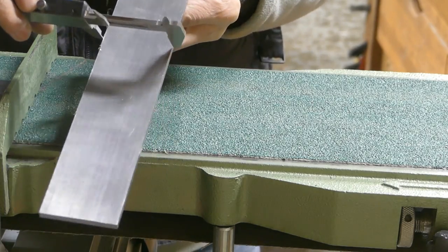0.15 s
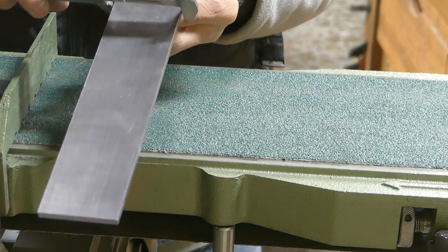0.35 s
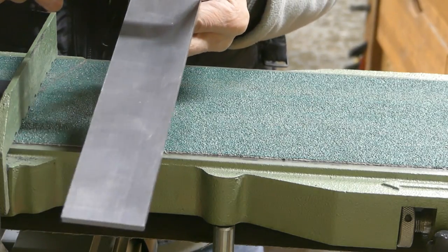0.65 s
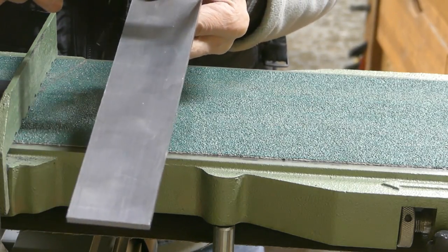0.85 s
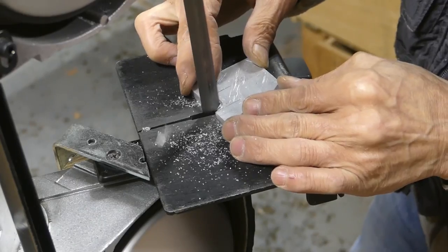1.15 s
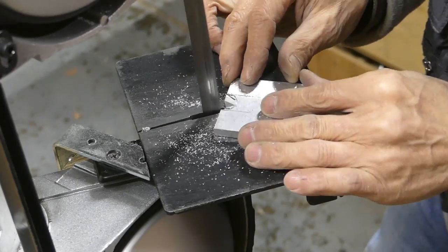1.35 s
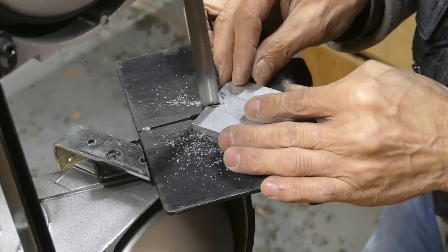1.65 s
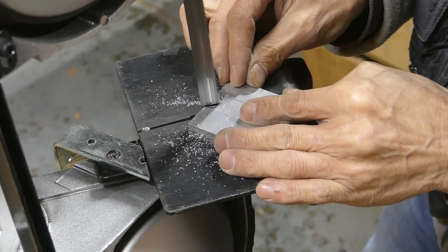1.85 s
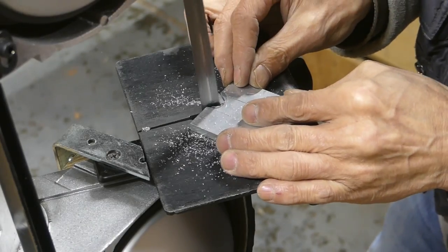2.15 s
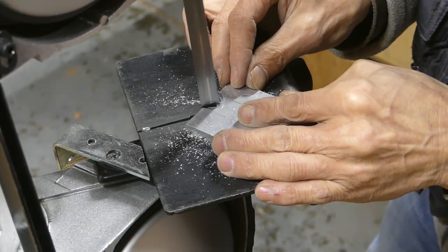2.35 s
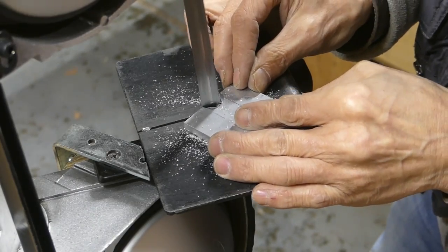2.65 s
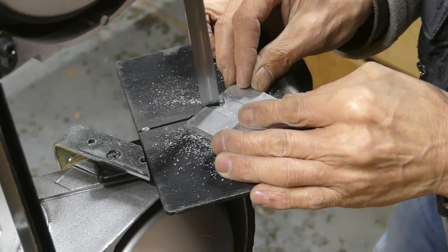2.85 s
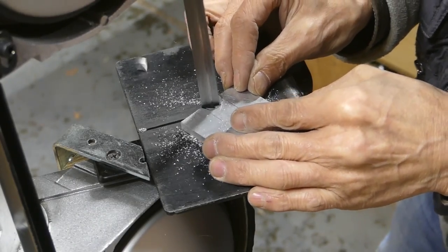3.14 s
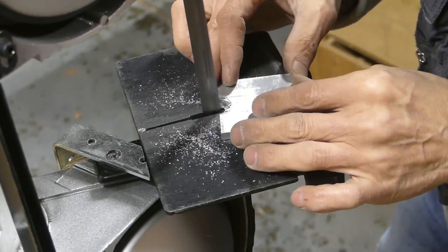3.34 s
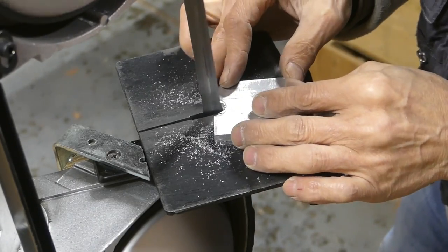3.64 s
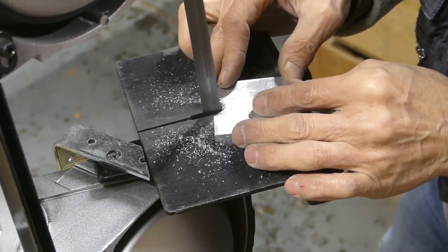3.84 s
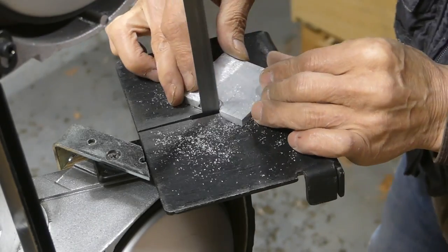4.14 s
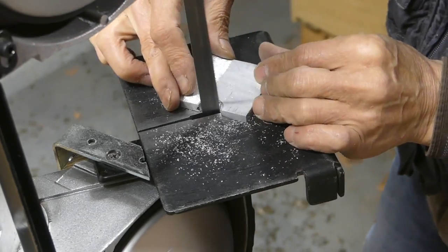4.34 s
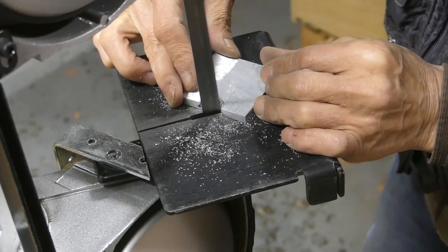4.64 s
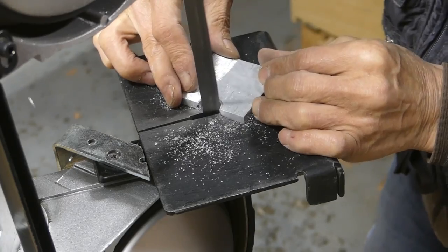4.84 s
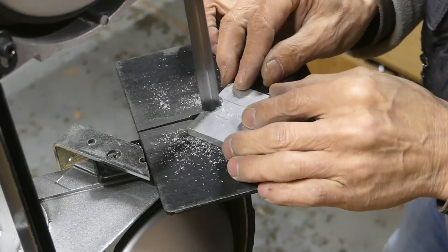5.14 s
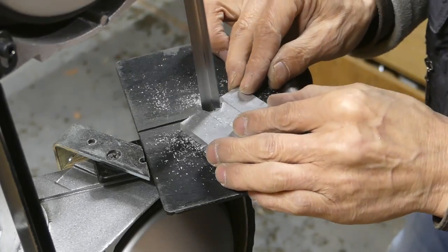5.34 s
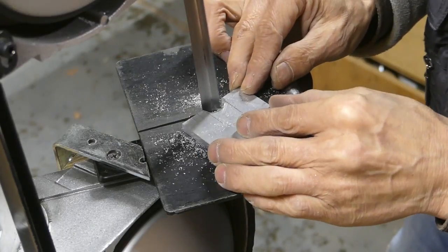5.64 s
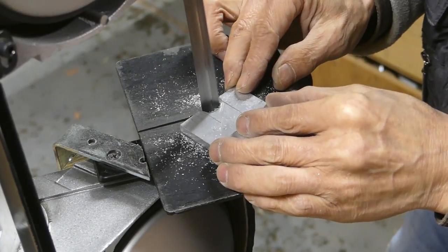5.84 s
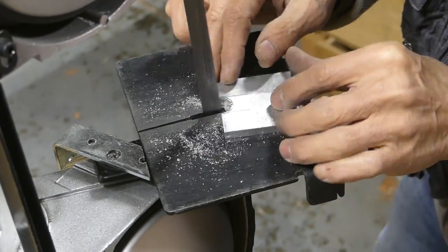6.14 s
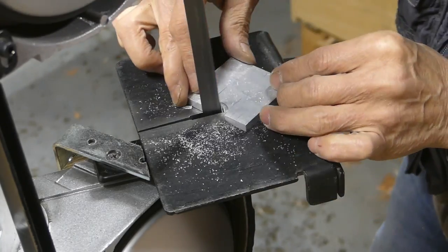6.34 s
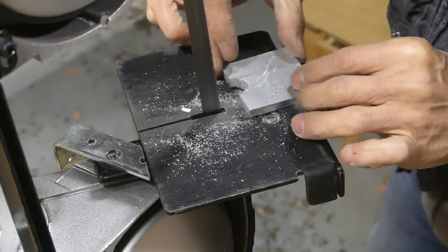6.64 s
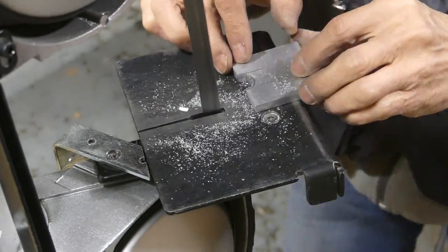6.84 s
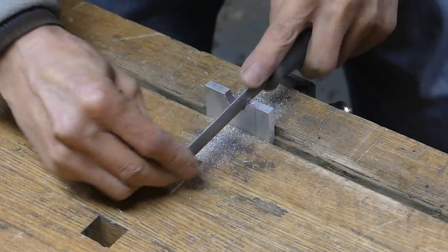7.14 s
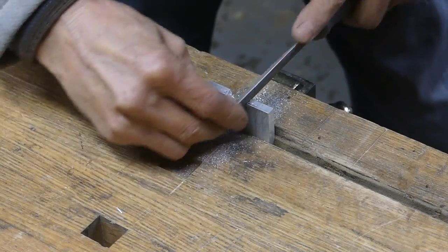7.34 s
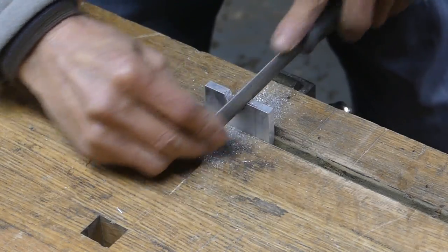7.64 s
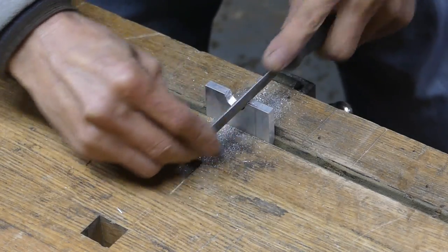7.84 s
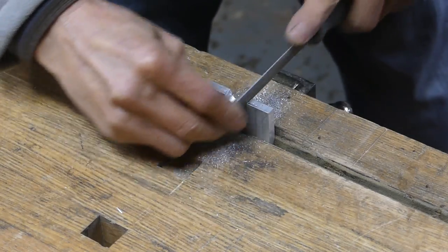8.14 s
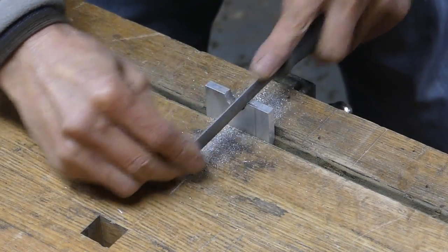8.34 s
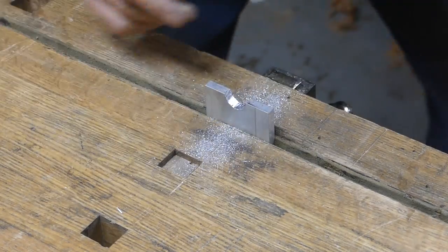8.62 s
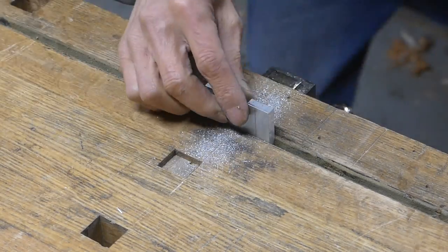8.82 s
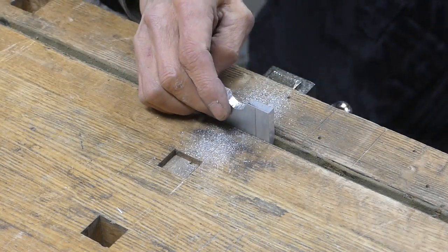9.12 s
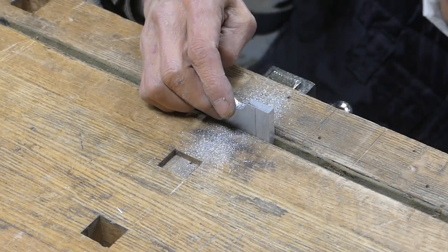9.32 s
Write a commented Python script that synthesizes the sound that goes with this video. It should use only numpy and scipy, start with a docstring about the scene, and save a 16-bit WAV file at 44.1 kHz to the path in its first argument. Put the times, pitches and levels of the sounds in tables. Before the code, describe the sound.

Close up in a small metal shop, calipers tick and scrape lightly on a steel blank over quiet room air. Abruptly a bandsaw cuts a small metal plate, with bright gritty hiss and a thin high whine that dips with each push. Another hard cut brings rapid back-and-forth filing, ringing and raspy, before fingers brush gritty filings from a wooden bench with one soft knock.

```python
"""A small metal shop, heard from close by: three jobs follow each other abruptly.
Calipers tick and slide on a steel blank: clicks ring its modes and coloured grit makes the scrape.
A bandsaw cuts a small plate: random chips ring the blade, and its sine whine sags under the load.
A hand file works the clamped plate in quick strokes of filtered grit, then fingers brush the filings
away and the bench takes a knock. Each job has its own quiet bed of filtered noise."""
import sys
import numpy as np
from scipy import signal
from scipy.fft import rfft, irfft, next_fast_len
from scipy.io import wavfile
from scipy.ndimage import uniform_filter1d

SR = 44100
rng = np.random.default_rng(int(sys.argv[2]) if len(sys.argv) > 2 else 0)


def put_to_file(sound):
    """Save the sound as 16-bit audio at rate SR, in the file named by the first command-line argument."""
    columns = np.atleast_2d(sound).T  # one column per channel
    safe = np.clip(columns, -1, 1)
    whole_steps = np.round(safe * 32767)
    wavfile.write(sys.argv[1], SR, whole_steps.astype(np.int16))


N = 418068
TIME = np.arange(N) / SR


def from_db(db):
    """Decibels to gain."""
    return 10 ** (np.asarray(db) / 20)


def rms_one(x):
    """Scale to unit power."""
    return x / np.sqrt(np.mean(x ** 2) + 1e-20)


def between(start, end):
    """1 while a job lasts, with edges of a millisecond."""
    return np.clip((TIME - start) * 1000, 0, 1) * np.clip((end - TIME) * 1000, 0, 1)


def drift(rate):
    """Random wander of rms 1, with `rate` random points a second joined by straight lines."""
    return rms_one(np.interp(TIME * rate, np.arange(N // 8), rng.standard_normal(N // 8)))


def colour(x, spectrum):
    """Give x a smooth spectrum; rms 1."""
    hz, db = np.transpose(spectrum)
    size = next_fast_len(N)
    bins = np.maximum(np.fft.rfftfreq(size, 1 / SR), 1)
    gain = from_db(np.interp(np.log(bins), np.log(hz), db))
    return rms_one(irfft(rfft(x, size) * gain, size)[..., :N])


def resonate(x, resonances):
    """A chain of peaks and notches; rms 1."""
    sections = []
    for hz, width, boost_db in resonances:
        half = np.pi * width / SR
        c = -2 * np.cos(2 * np.pi * hz / SR)
        g = from_db(boost_db / 2)
        section = np.array([1 + half * g, c, 1 - half * g, 1 + half / g, c, 1 - half / g])
        sections.append(section / (1 + half / g))
    return rms_one(signal.sosfilt(sections, x))


def ring(clicks, modes):
    """A click sets each mode ringing at its own level, as a decaying sine."""
    out = 0
    for hz, db, t60 in modes:
        r = from_db(-60 / (t60 * SR))
        w = 2 * np.pi * hz / SR
        mode = signal.lfilter([0, np.sin(w)], [1, -2 * r * np.cos(w), r * r], clicks + 1e-18)
        out = out + from_db(db) * mode
    return out


def chips(per_s, spread_db):
    """Tiny fractures of uneven size at random moments; rms 1."""
    sizes = from_db(spread_db * np.clip(rng.standard_normal(N), -2, 2)) * rng.choice([-1, 1], N)
    return rms_one(sizes * (rng.random(N) < per_s / SR))


def swells(rows):
    """Envelope of sounds that build up along a bell curve and die away exponentially."""
    envelope = 0
    for s, rise, fall, db in rows:
        exponent = np.where(TIME < s, ((TIME - s) / rise) ** 2, (TIME - s) / fall)
        envelope = envelope + from_db(db) * np.exp(-exponent)
    return envelope


def shop(x, near_db, tail_db, near_t60=0.04, shop_t60=0.34):
    """Direct sound, quick reflections from the work surface and a short tail, different in each ear."""
    t = TIME[:SR // 2]
    out = x
    for db, t60 in ((near_db, near_t60), (tail_db, shop_t60)):
        echoes = rng.standard_normal((2, len(t))) * from_db(-60 * t / t60) * (t > .001)
        echoes /= np.sqrt(np.sum(echoes ** 2, axis=1, keepdims=True))
        out = out + from_db(db) * signal.fftconvolve(x[None], echoes, axes=1)[:, :N]
    return out


def pan(x, left_db):
    """Lean to the left by a level difference."""
    return x * from_db(np.array([[left_db], [-left_db]]) / 2)


def bandsaw(wheel_hz=10.9, wheel_db=0.32, bite_db=0.7, cut_db=-24.0, drive_db=0.0,
            hum_hz=848, hum_db=0.0, unsteady=0.001243):
    """Teeth tear chips that ring the blade; teeth and drive sing at multiples of one speed."""
    # Cutting noise. Each row: frequency in Hz, relative level in dB.
    cut_colour = [(40, -115.2), (170, -115.4), (430, -107.4), (620, -91.5), (1050, -90.5), (1450, -83.5),
                  (1800, -81.5), (2700, -75.5), (3800, -65), (5500, -69), (6900, -67.5), (8500, -66.5),
                  (12000, -65.5), (15600, -67.5)]
    # Resonances of blade and saw table. Each row: frequency in Hz, width in Hz, boost in dB.
    blade = [(690, 25, 5.5), (775, 27, 2.5), (2320, 280, 2.5), (3436, 31, 4.5), (4410, 54, 5.5),
             (4666, 73, -4), (4804, 49, 6.5), (6400, 90, -6.5), (6360, 63, 7.5), (6570, 64, 15),
             (6680, 210, -10.5), (7360, 450, 8), (8050, 210, -3.5), (8290, 170, 6), (9860, 210, -2.5),
             (10500, 700, 0), (12430, 670, -4.5), (13100, 300, 1)]
    # Overtones of the teeth. Each row: multiple of the tooth rate, level against the whine in dB.
    tooth_orders = [(2, -13), (3, -12)]
    # Tones of the drive. Each row: multiple of the tooth rate, level in dB.
    drive_orders = [(.277, -69), (.347, -72), (.554, -61), (1.8, -52), (3.324, -44)]
    # The plate hums on the saw table in spells. Each row: peak in seconds,
    # rise and also fall time in seconds, level in dB.
    plate_hum = [(1.77, .08, -56.5), (2.037, .03, -59), (2.67, 0.16, -57.5), (3.05, 0.098, -54.5),
                 (3.56, .06, -58.5), (3.8, 0.056, -60), (4.88, 0.039, -62), (5.92, .12, -59)]
    # near full speed the teeth meet a resonance of the blade, and the whine swells
    whine_hz, whine_width_hz = 2220, 26
    whine_db, whine_boost_db = -46.8, 8.6

    tooth_hz = tooth_rate()
    phase = 2 * np.pi * np.cumsum(tooth_hz * (1 + unsteady * drift(60))) / SR
    # the feed throbs once per turn of the wheel, and the teeth bite unevenly
    throb_db = wheel_db * np.sin(2 * np.pi * wheel_hz * TIME)
    bite = from_db(throb_db + bite_db * drift(900) + 0.26 * drift(60))
    grit = colour(chips(per_s=22000, spread_db=3) * bite, cut_colour)
    cutting = resonate(grit, blade) * from_db(cut_db)

    overtones = sum(from_db(db) * np.sin(k * phase + .7 * drift(70)) for k, db in tooth_orders)
    in_tune = np.exp(-((tooth_hz - whine_hz) / whine_width_hz) ** 2)
    whine_level = from_db(whine_db + whine_boost_db * in_tune + 1.4 * drift(70))
    whine = whine_level * (np.sin(phase) + overtones)

    drive = 0
    for k, db in drive_orders:
        level = from_db(db + drive_db + 1.0 * drift(25))
        drive = drive + level * np.sin(k * phase + .5 * drift(45))

    spells = swells([(s, half, half, db) for s, half, db in plate_hum])
    hum_tone = np.sin(2 * np.pi * hum_hz * TIME + 1.0 * drift(45))
    hum = hum_tone * spells * from_db(hum_db + 2.0 * drift(40))
    tones = np.sqrt(2) * (whine + drive + hum)
    return pan(shop(cutting, near_db=-6.5, tail_db=-16.5) + tones, left_db=1.0)


def tooth_rate():
    """Every push drags the blade smoothly below its free speed, and it recovers as the hand eases off."""
    # Tooth rate running free, sinking slowly through the job. Each row: time in seconds, rate in Hz.
    free_speed = [(1.0, 2232), (6.95, 2212)]
    # The plate is pushed into the blade, which slows. Each row: hardest push in seconds,
    # lean in seconds, ease off in seconds, sag of the tooth rate in Hz.
    pushes = [(1.08, .4, 0.3, 86), (1.958, .41, .15, 91), (2.32, 0.28, 0.43, 78), (2.81, .19, 0.12, 72),
              (3.15, 0.38, .12, 54), (3.61, 0.12, .12, 54), (3.829, 0.16, .18, 43), (4.27, .21, 0.56, 33),
              (4.85, .19, .22, 41), (5.37, .19, 0.098, 22), (5.58, 0.1, .21, 41), (6.03, 0.29, 0.19, 42),
              (6.59, .24, 0.073, 17.4)]
    hz = np.interp(TIME, *np.transpose(free_speed))
    for s, lean, ease, sag_hz in pushes:
        push = np.interp(TIME, [s - lean, s, s + ease], [0, 1, 0])
        hz = hz - sag_hz * np.sin(np.pi / 2 * push) ** 2
    return hz


def hand_file(rasp_db=4.0, turn_db=-11, speed_power=0.89, catch_db=1.0, stop_s=0.048,
              ring_width_hz=190, ring_db=10, lowest_hz=100, groan_hz=765, sing_db=1.0):
    """The file speeds up and stops in every stroke; speed makes it louder, and its teeth catch in bursts."""
    # Strokes, push and pull in turn. Each row: start in seconds, relative level of the bite
    # into the plate in dB, relative level of the file's ring in dB.
    strokes = [(6.931, -28.5, -30.5), (6.988, -41, -31), (7.063, -29, -31), (7.127, -23.5, -27.5),
               (7.197, -24, -25.5), (7.26, -28.5, -26.5), (7.329, -30.5, -28.5), (7.395, -32.5, -25.5),
               (7.47, -29, -31), (7.539, -26.5, -30), (7.606, -27, -29.5), (7.668, -30, -28.5),
               (7.74, -30.5, -28.5), (7.802, -32, -28.5), (7.876, -31, -27.5), (7.942, -21.5, -29.5),
               (8.008, -28, -29.5), (8.077, -33.5, -27), (8.148, -30.5, -30), (8.212, -30, -26),
               (8.289, -25.5, -27.5), (8.353, -23.5, -24), (8.421, -28.5, -27.5), (8.488, -27, -29.5)]
    strokes_end_s = 8.556
    # Rasp of the file. Each row: frequency in Hz, relative level in dB.
    rasp_colour = [(40, -105.0), (90, -99.6), (170, -84), (300, -71.5), (550, -82.5), (1000, -70.5),
                   (1500, -64), (2200, -69), (3500, -67.5), (5500, -66), (7000, -76.5), (8300, -73),
                   (10500, -76.5), (15500, -89)]
    # Resonances of file, plate and vice. Each row: frequency in Hz, width in Hz, boost in dB.
    vice = [(471, 36, 12), (643.7, 63, 19), (769, 35, 14.5), (1040, 60, -6.5), (1294, 45, 8.5),
            (1530, 58, -16), (1700, 75, -0.5), (2170, 92, -13), (2624, 21, 15), (2847, 60, 11),
            (3850, 25, 5.5), (4530, 710, 4.5), (4660, 50, -2), (5100, 90, -11), (5980, 250, 4),
            (6780, 56, 15), (7060, 68, 13), (7970, 70, 4)]
    # The plate judders once in the vice. Each row: peak, rise and fall in seconds, level in dB.
    judder = [(7.022, 0.021, .022, -30)]
    push_ring_hz, pull_ring_hz, ring_scatter_hz = 4654, 4380, 100  # the file rings higher on the push
    # a ring of the plate that shifts with the spot
    plate_centre_hz, plate_scatter_hz, plate_width_hz, plate_boost_db = 1620, 280, 110, 8.5
    push_bench_db, pull_bench_db = -30, -27  # the pull shakes the bench more
    # relative hiss at the usual bite, and its share of the bite's swing
    usual_bite_db, usual_hiss_db, hiss_follows = -28, -29, 0.45

    starts, *levels = np.transpose(strokes)
    progress = np.interp(TIME, np.append(starts, strokes_end_s), np.arange(len(starts) + 1))
    speed = np.abs(np.sin(np.pi * progress))
    stroke = np.minimum(progress.astype(int), len(starts) - 1)
    bite_db, file_db = [uniform_filter1d(c[stroke], size=800) for c in levels]
    pulling = uniform_filter1d((stroke % 2).astype(float), size=400)

    catches = rms_one(from_db(catch_db * drift(600)))
    teeth = resonate(colour(chips(per_s=12000, spread_db=2.0) * catches, rasp_colour), vice)
    # the file meets the plate at a new spot in each stroke, so both ring a little differently
    rasp = 0
    for k, (on_file, on_plate) in enumerate(rng.uniform(-1, 1, (len(starts), 2))):
        file_hz = (push_ring_hz, pull_ring_hz)[k % 2] + ring_scatter_hz * on_file
        plate_hz = plate_centre_hz + plate_scatter_hz * on_plate
        rings = [(file_hz, ring_width_hz, ring_db), (plate_hz, plate_width_hz, plate_boost_db)]
        rasp = rasp + resonate(teeth, rings) * (stroke == k)
    rasp = signal.sosfilt(signal.butter(2, lowest_hz, "high", fs=SR, output="sos"), rasp)

    # from low to high: bench, plate, file and the hiss of the chips, which follows the bite
    low, mid, high = [signal.sosfiltfilt(signal.butter(2, hz, fs=SR, output="sos"), rasp)
                      for hz in (950, 2300, 5600)]
    turning = from_db(turn_db) * np.exp(-np.maximum(TIME - strokes_end_s, 0) / stop_s)
    cut = np.hypot(turning, speed ** speed_power)
    bench_db = push_bench_db + pulling * (pull_bench_db - push_bench_db)
    # the heavy bench rings on through the turns
    bench = low * from_db(bench_db) * (1.85 * turning + 0.27 * speed)
    plate = (mid - low) * from_db(bite_db)
    singing = from_db(sing_db * (speed - 0.9))  # the file rings best at full speed
    file_ring = (high - mid) * from_db(file_db) * singing
    hiss = (rasp - high) * from_db(usual_hiss_db + hiss_follows * (bite_db - usual_bite_db))
    filing = from_db(rasp_db) * (bench + (plate + file_ring + hiss) * cut)

    groan = swells(judder) * np.sin(2 * np.pi * groan_hz * TIME + 1.3 * drift(240))
    return pan(shop(filing + groan, near_db=-11.5, tail_db=-12.0), left_db=-0.3)


def brushing(thump_db=-4, lowest_hz=190):
    """Fingers sweep gritty filings over the wood, and the bench takes one soft knock."""
    # Brushes of the fingers. Each row: peak, rise and fall in seconds, level in dB.
    brushes = [(8.705, 0.044, 0.034, -36), (8.84, 0.033, .04, -40.5), (8.922, 0.055, 0.029, -34.5),
               (9.03, 0.055, 0.28, -57), (9.28, 0.044, .05, -66)]
    # Grit on wood. Each row: frequency in Hz, relative level in dB.
    brush_colour = [(88, -64), (150, -24), (462, -5), (607, -4), (912, 0.5), (1150, -4), (1400, 2),
                    (1630, -6), (1910, 2.5), (3690, -1.5), (8330, -4), (15500, -10.5)]
    # One knock on the wooden bench: time in seconds, relative strength in dB.
    knock_s, knock_db = (8.731, -36)
    # Modes of the bench. Each row: frequency in Hz, relative level in dB, 60 dB decay in seconds.
    bench_modes = [(226, -25, .11), (330, -2, .07), (425, 3.5, 0.088), (535, 4, .06), (620, 4, 0.097)]
    grit = colour(chips(per_s=11000, spread_db=5.5), brush_colour) * swells(brushes)
    blow = np.zeros(N)
    blow[int(knock_s * SR)] = from_db(knock_db + thump_db)
    # the band-pass makes the blow soft
    blow = signal.sosfilt(signal.butter(3, [lowest_hz, 800], "band", fs=SR, output="sos"), blow)
    return pan(shop(grit + ring(blow, bench_modes), near_db=-5, tail_db=-8.5), left_db=-1.0)


def calipers(crack_s=0.0053, crack_db=-9, ring_db=-12.5, grit_db=1.0):
    """Each touch is a crack and a ring of the steel; the jaws also scrape as they slide."""
    # Jaws touching the blank. Each row: time in seconds, relative strength in dB.
    ticks = [(.002, -34), (.011, -34.5), (.119, -45.5), (.270, -36.5), (0.333, -48), (.436, -47)]
    # Ringing of the steel. Each row: frequency in Hz, relative level in dB, 60 dB decay in seconds.
    steel_modes = [(1140, -0.5, 0.073), (2405, -11, 0.11), (3600, -8, 0.2), (3640, -3.5, 0.25),
                   (4630, -4, 0.11), (5120, -17, .1), (5930, -12, .07), (11000, -8, .07), (11300, 0, 0.074)]
    # Jaws sliding along the blank. Each row: peak in seconds, level in dB.
    slides = [(.016, -46.5), (.125, -57), (.243, -54.5), (.340, -54), (.480, -46), (.503, -51), (.793, -49),
              (.812, -58)]
    # Sliding steel. Each row: frequency in Hz, relative level in dB.
    slide_colour = [(300, -34), (1000, -6), (2800, -11), (4200, -5), (5000, 3.5), (6000, 0), (7800, -11),
                    (10500, -4.5), (13500, -7), (14400, -7), (15800, -18)]
    slide_rise_s, slide_fall_s = .006, 0.029
    clicks = np.zeros(N)
    for s, db in ticks:
        clicks[int(s * SR)] = from_db(db)
    decay = np.exp(-1 / (crack_s * SR))
    cracks = from_db(crack_db) * signal.lfilter([1], [1, -decay], clicks + 1e-18)
    friction = colour(chips(per_s=9000, spread_db=2.0), slide_colour)
    sliding = swells([(s, slide_rise_s, slide_fall_s, db) for s, db in slides])
    contact = sliding * from_db(grit_db * drift(250)) + cracks
    ringing = from_db(ring_db) * ring(clicks, steel_modes)
    return shop(friction * contact + ringing, near_db=-7, tail_db=-16)


def air(spectrum, side_db):
    """Diffuse background of the shop: coloured noise, with a separate noise opposed in the two ears."""
    mid, side = colour(rng.standard_normal((2, N)), spectrum)
    return mid + from_db(side_db) * side * np.array([[1], [-1]])


def scene():
    """Measuring, sawing, filing, each cutting straight to the next."""
    # Still air while measuring, faint rumble around the saw, still air around the bench.
    # Each row: frequency in Hz, relative level in dB.
    measuring_air = [(25, -16), (70, -12), (105, -1), (135, -0.5), (200, -11.5), (400, -17), (900, -19),
                     (1600, -24.5), (3000, -32.5), (5200, -29.5), (7600, -33.5), (10000, -30.5),
                     (15500, -36)]
    saw_air = [(30, -4), (200, -13), (600, 6), (2000, -10)]
    bench_air = [(24, -58), (40, -27), (197, -4), (377, -2.5), (670, -6), (859, -6.5), (1100, -12),
                 (2640, -12), (3220, -16), (15500, -26)]
    saw_start_s, file_start_s = .992, 6.952
    measuring = calipers() + from_db(-55) * air(measuring_air, side_db=0)
    sawing = bandsaw() + from_db(-85.5) * air(saw_air, side_db=15.5)
    filing = hand_file() + brushing() + from_db(-59.0) * air(bench_air, side_db=2)
    out = measuring * (1 - between(saw_start_s, np.inf))
    out = out + sawing * between(saw_start_s, file_start_s)
    return out + filing * between(file_start_s, np.inf)


def record(dry, cutoff_hz=15800):
    """The top is cut steeply."""
    return signal.sosfilt(signal.ellip(12, .1, 80, cutoff_hz, fs=SR, output="sos"), dry)


dry = scene()
out = record(dry)
put_to_file(out)
```